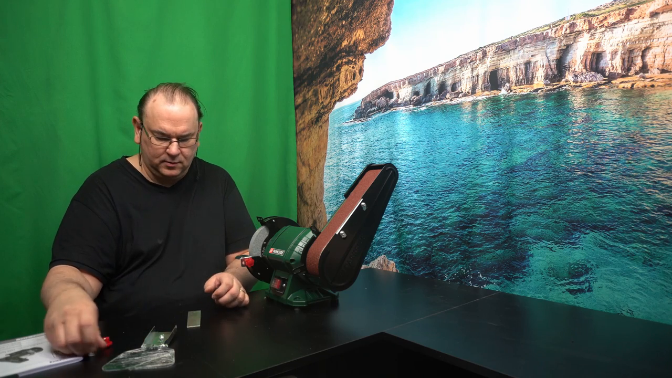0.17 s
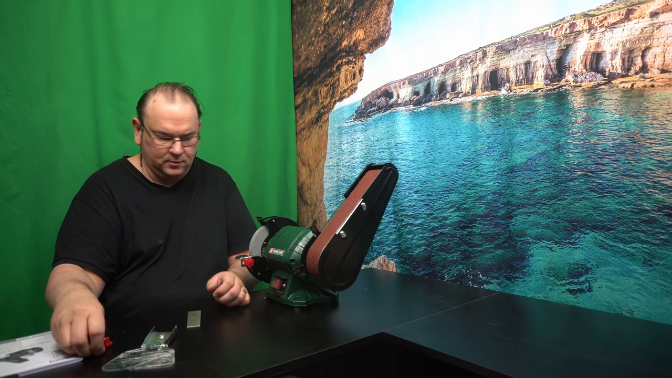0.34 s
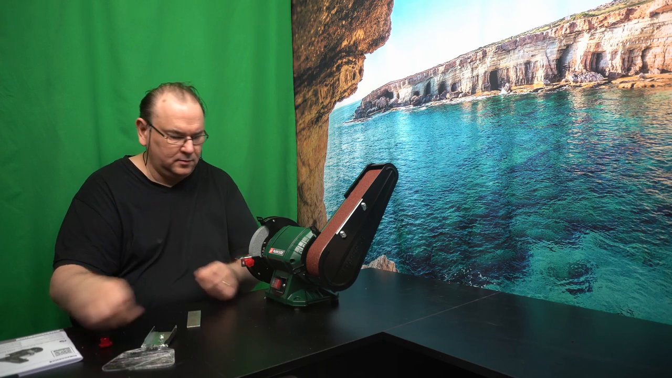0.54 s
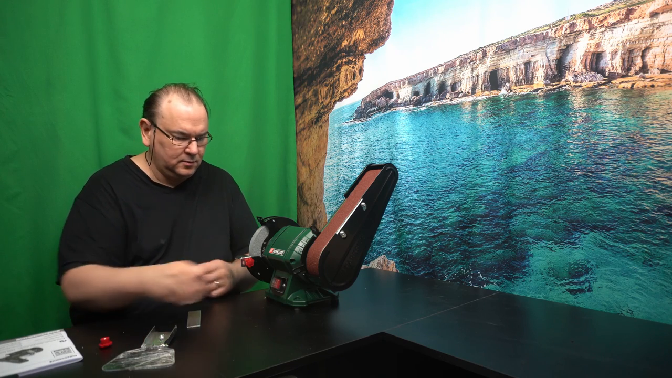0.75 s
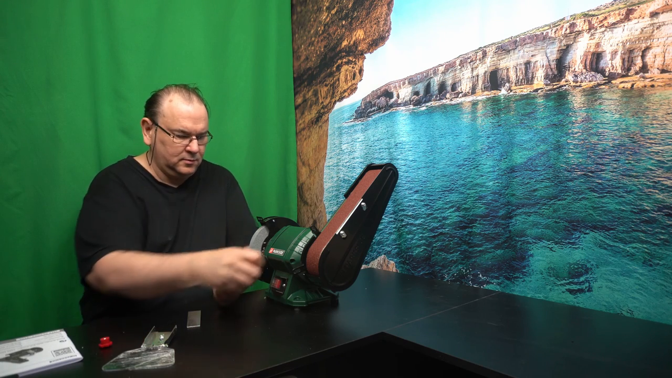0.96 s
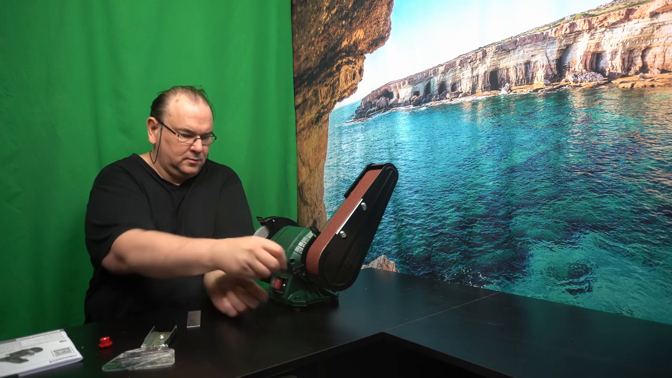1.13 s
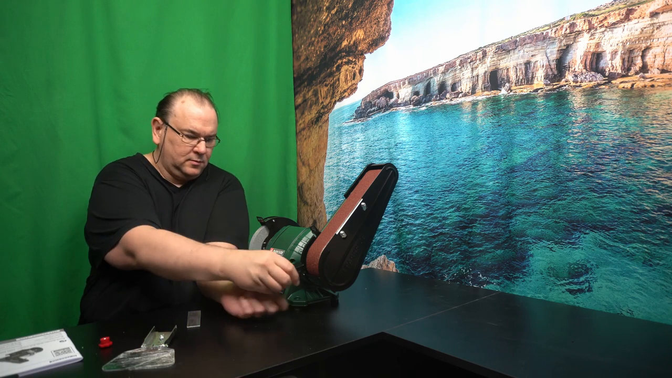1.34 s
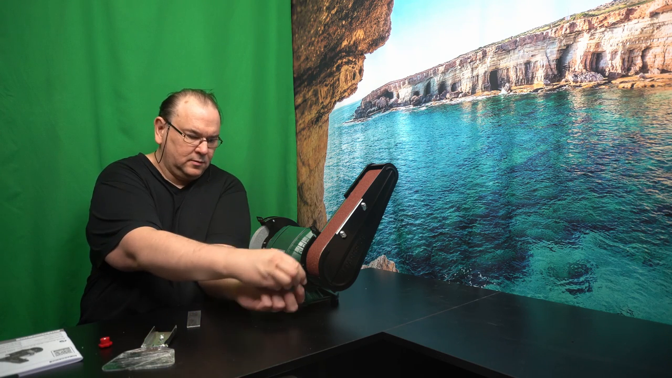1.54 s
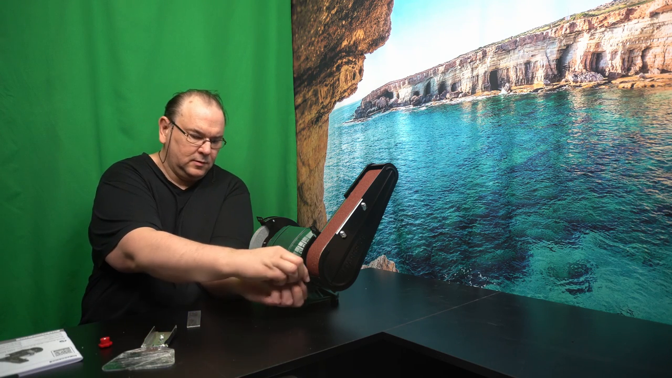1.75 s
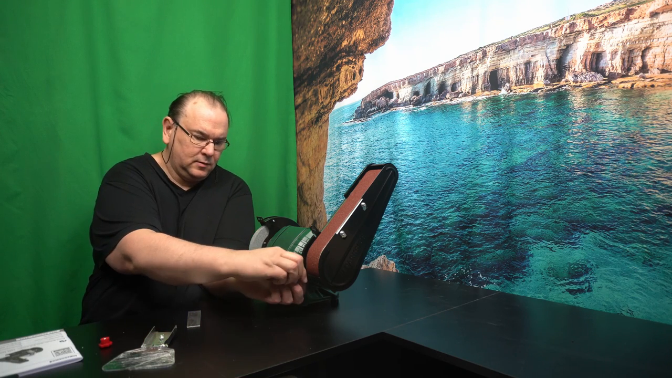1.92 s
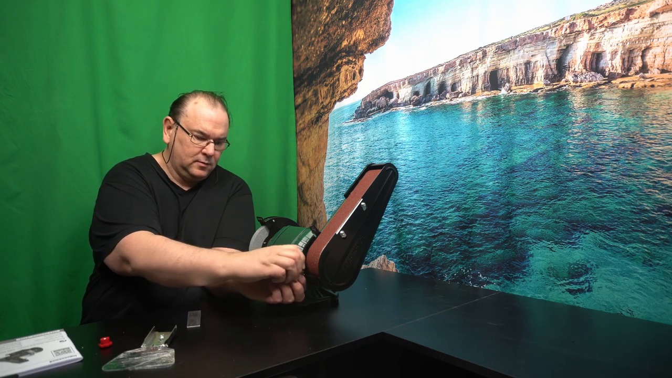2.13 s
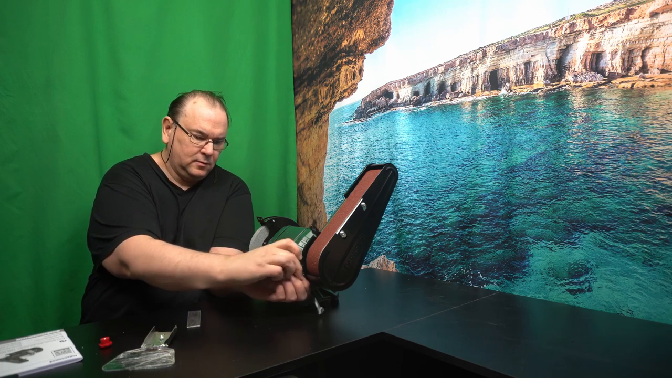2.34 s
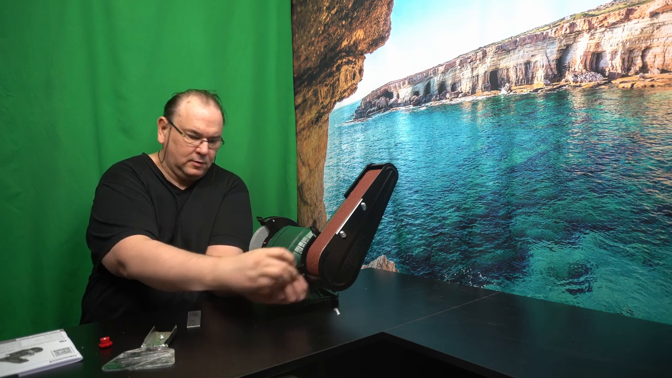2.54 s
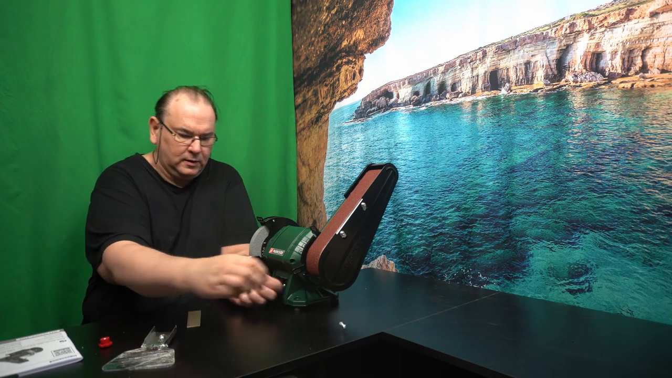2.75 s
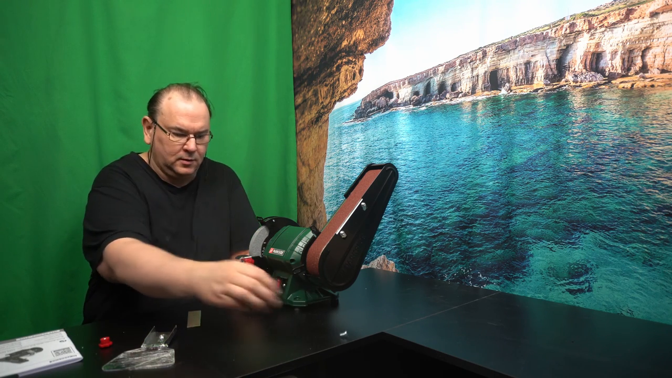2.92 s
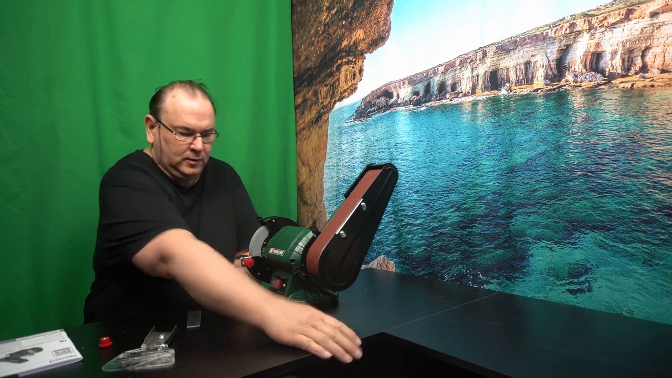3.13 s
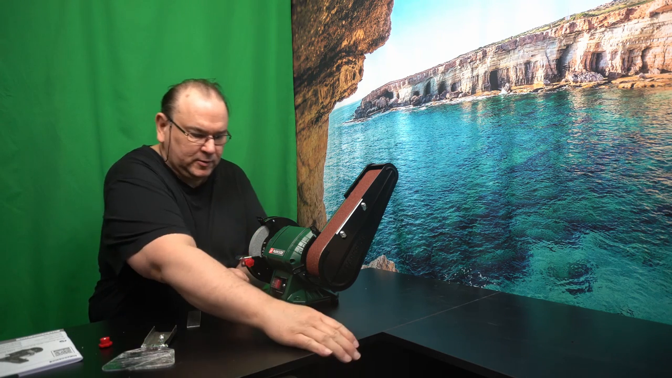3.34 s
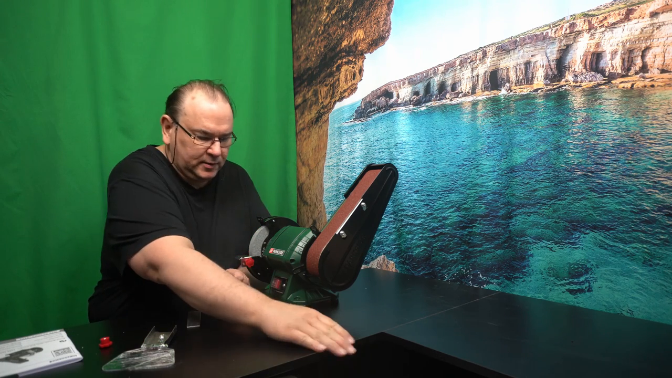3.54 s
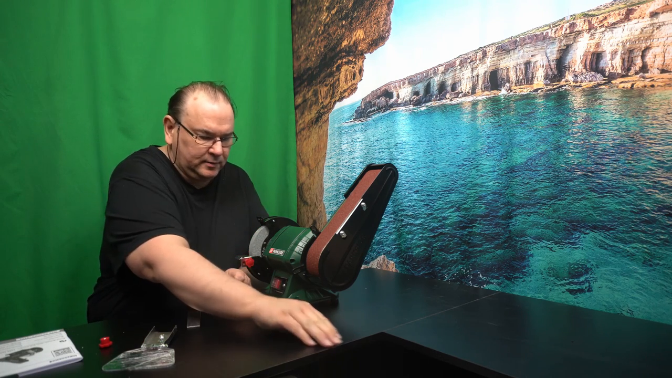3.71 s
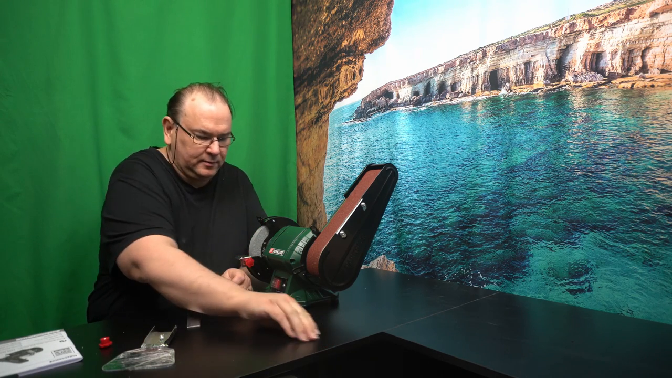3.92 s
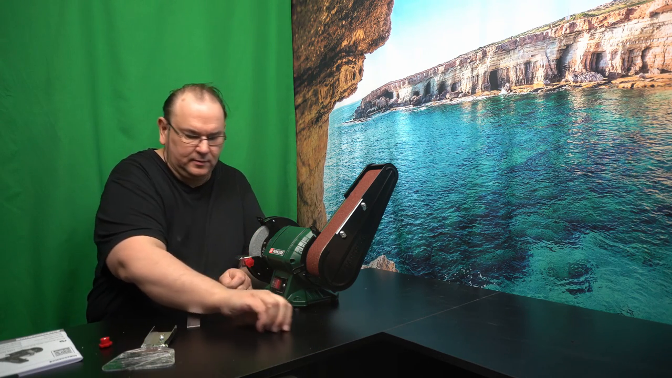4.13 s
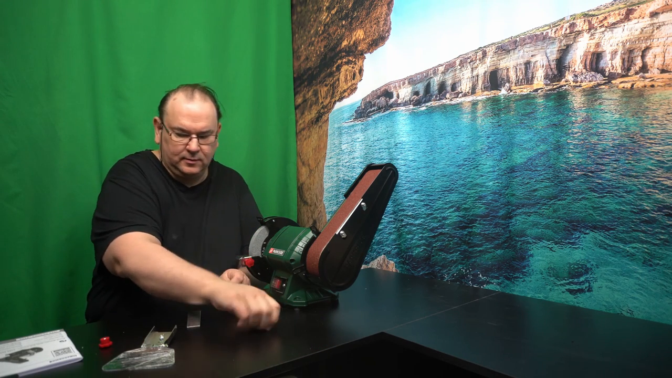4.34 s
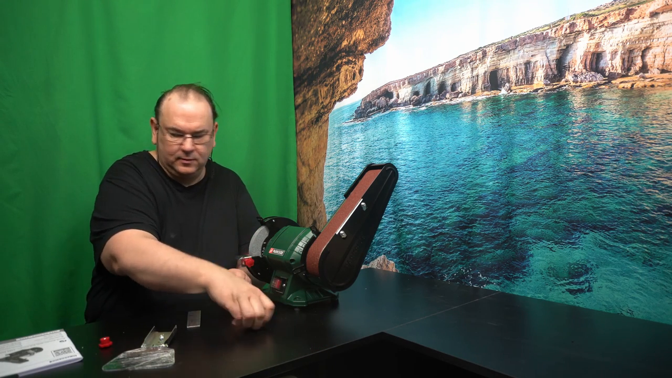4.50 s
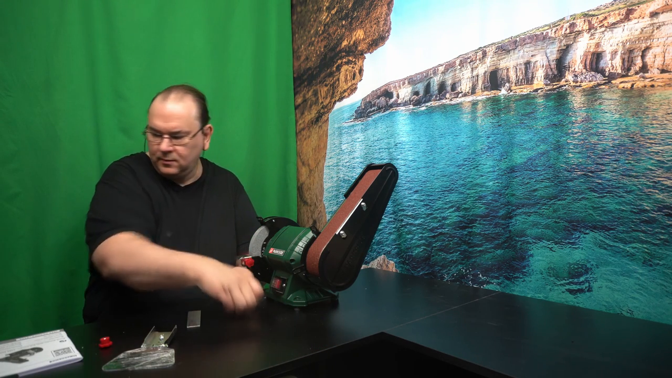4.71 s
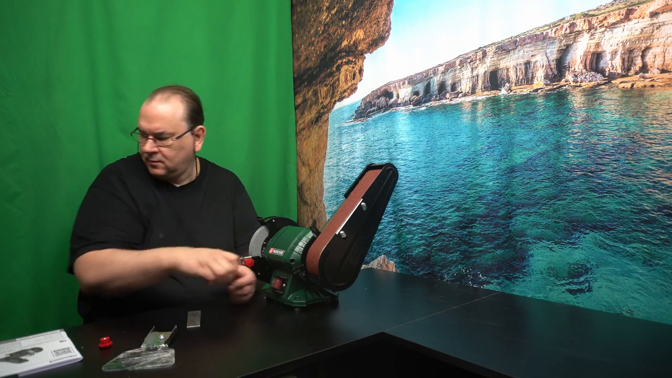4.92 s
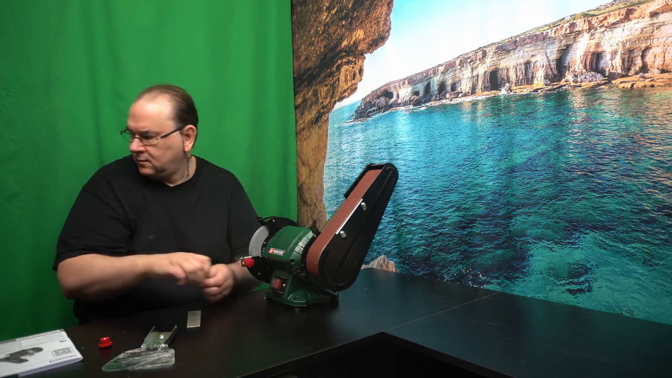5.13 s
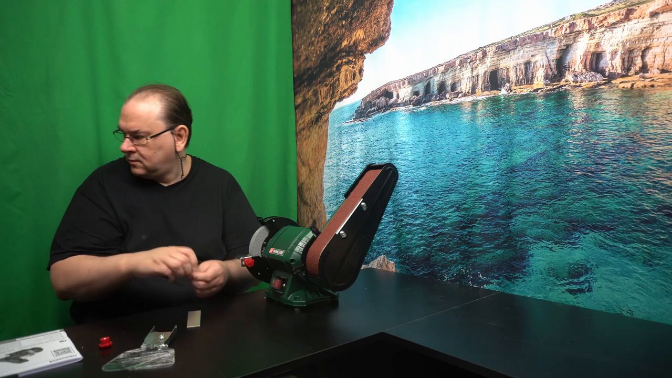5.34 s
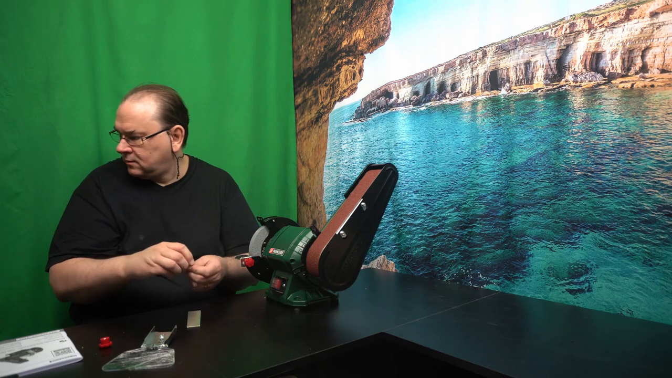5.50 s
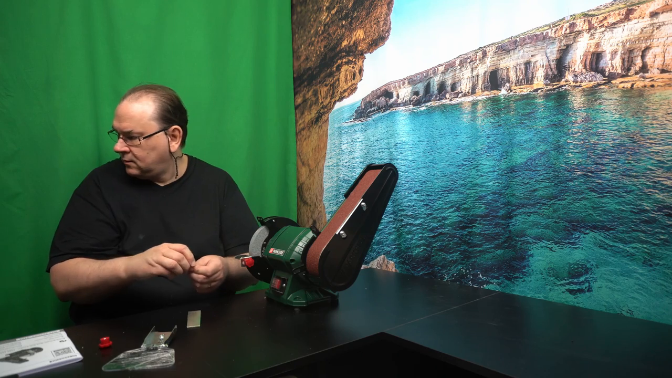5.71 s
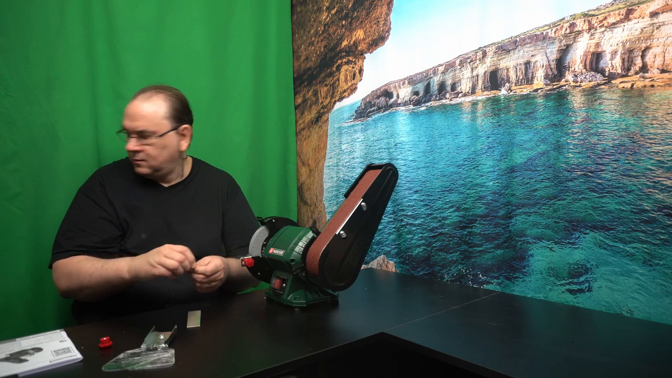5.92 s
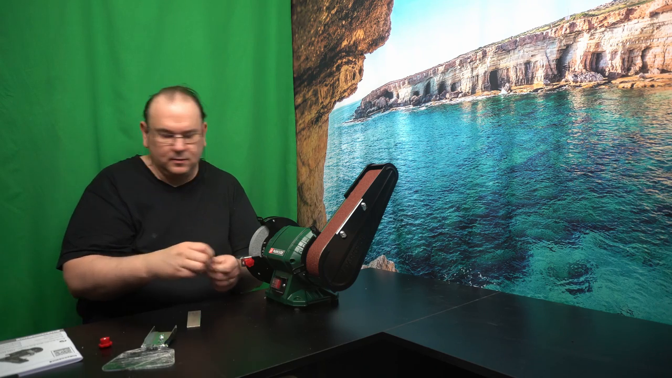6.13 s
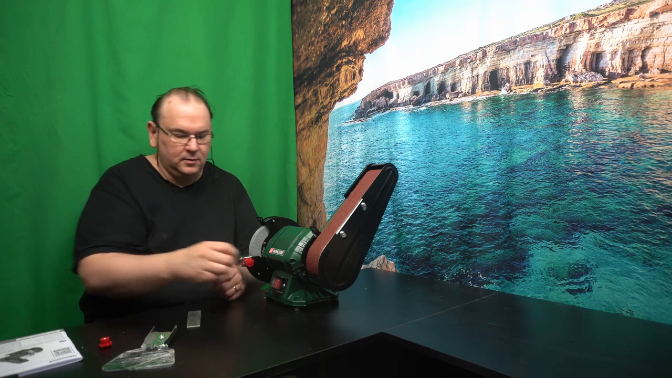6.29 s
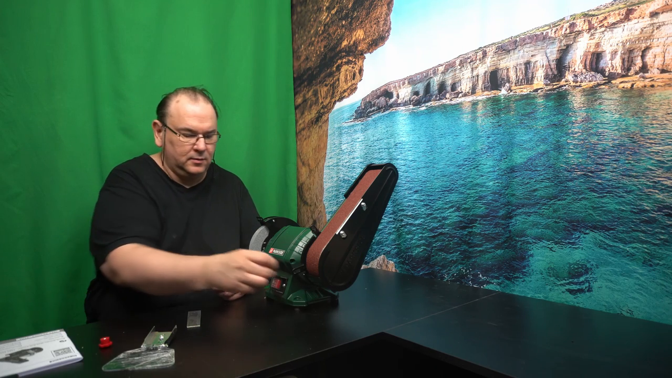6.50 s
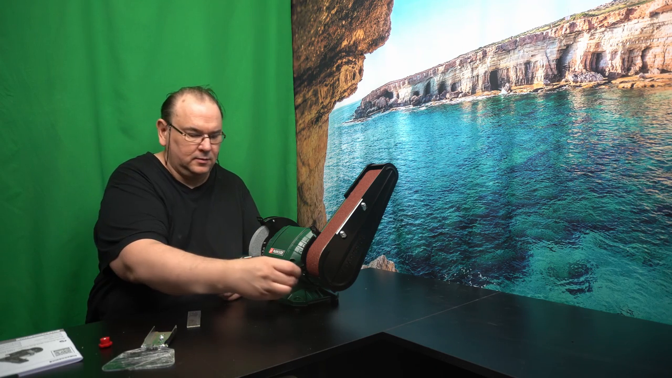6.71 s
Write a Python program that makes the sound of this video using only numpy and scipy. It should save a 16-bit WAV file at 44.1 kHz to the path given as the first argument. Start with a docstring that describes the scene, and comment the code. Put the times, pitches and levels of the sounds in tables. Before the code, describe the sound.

In a small quiet room with a steady low hum, someone near the microphone lifts a screw from a table with a few clicks. After a soft rustle of cloth come short ringing clinks against a metal bracket. The screw falls and clatters loudly across the tabletop, a hand slaps down on it, and it scrapes back over the board. Only faint sleeve movement and a few light ticks remain.

```python
"""A screw is picked off a table and fitted to a metal bracket; it slips, clinks down the machine,
bounces and rolls across the tabletop, and is dragged back. Its blows and rubbing sound through the
board's resonances; its knocks set guard, bracket and washer ringing. Sleeves rustle, fingernails
tick, and mains hum sits under the air of a small quiet room."""
import sys
import numpy as np
from scipy import signal
from scipy.fft import rfft, irfft
from scipy.io import wavfile
from scipy.ndimage import uniform_filter1d

SR = 44100
rng = np.random.default_rng(int(sys.argv[2]) if len(sys.argv) > 2 else 0)


def dump_mix(stems):
    """Bounce the given channels to the path in sys.argv[1] as a 16-bit WAV at rate SR."""
    frames = np.atleast_2d(stems).T  # one column per channel
    limited = np.clip(frames, -1, 1)  # hard clip at full scale
    pcm = np.round(limited * 32767).astype(np.int16)
    wavfile.write(sys.argv[1], SR, pcm)


N = 298021

# Tone of the sleeves and finger ticks. Each row: frequency in Hz, level in dB.
HANDLING_EQ = [(500, -5), (1000, -10), (1800, -3), (2300, -1), (3400, 1), (4200, -4.5), (8000, -14),
               (12000, -18), (16000, -17)]


def gain_of(db):
    """Decibels to a factor."""
    return 10 ** (np.asarray(db) / 20)


def unit_rms(x):
    """Scales to rms 1."""
    return x / np.sqrt(np.mean(x ** 2) + 1e-20)


def curve(points, hz, column=1):
    """Reads one column of a table on a log-frequency axis."""
    columns = np.transpose(points)
    return np.interp(np.log(hz + 1), np.log(columns[0] + 1), columns[column])


def add(mix, start, sound):
    """Mixes a sound in at start seconds."""
    part = mix[round(start * SR):][:len(sound)]
    part += sound[:len(part)]


def impulse(db):
    """Minimum-phase impulse response of an EQ curve spanning 0..SR/2."""
    log_gain = np.log(gain_of(np.maximum(np.r_[db, db[-2:0:-1]], -100)))
    return np.fft.ifft(np.exp(np.conj(signal.hilbert(log_gain)))).real[:len(db)]


def coloured(x, db):
    """Passes x through an EQ curve; the result has rms 1."""
    return unit_rms(signal.oaconvolve(x, impulse(db))[:len(x)])


def bands(hz, low_hz=800, high_hz=6600):
    """Low, mid and high shares of a smooth crossover."""
    low = 1 / (1 + (hz / low_hz) ** 6)
    high = 1 - 1 / (1 + (hz / high_hz) ** 8)
    return low, 1 - low - high, high


def bell(hz, centre, width, db):
    """A resonant bump for an EQ curve, in dB."""
    return db / (1 + (2 * (hz - centre) / width) ** 2)


def flicker(depth_db, samples):
    """A gain that wanders at random, smoothed over so many samples."""
    return gain_of(depth_db * unit_rms(uniform_filter1d(rng.standard_normal(N), samples)))


def fader(gestures, column):
    """Gain ride, silent between gestures; columns after 1 are dB offsets from column 1."""
    out = np.zeros(N)
    for gesture in gestures:
        columns = np.transpose(gesture)
        t = np.arange(columns[0, 0], columns[0, -1], 1 / SR)
        db = np.interp(t, columns[0], columns[1] + (columns[column] if column > 1 else 0))
        fades = np.minimum(1, np.minimum(t - t[0], t[-1] - t) / .008)
        add(out, t[0], gain_of(db) * fades)
    return out


def chatter(noise, t60, rise=.0005):
    """A contact: noise that starts sharply and dies away."""
    t = np.arange(len(noise)) / SR
    return noise * gain_of(-60 * t / max(t60, .004)) * np.minimum(1, t / max(rise, 1e-4))


def peaked(x, db):
    """Scales a short sound so that its envelope peaks at db."""
    return gain_of(db) * x / np.sqrt(2 * uniform_filter1d(x ** 2, size=60).max())


def resonate(x, hz, width):
    """A moving resonance: shifts the curve hz down to zero, smooths, and shifts back."""
    carrier = np.exp(2j * np.pi * np.cumsum(hz) / SR)
    pole = np.exp(-np.pi * width / SR)
    return unit_rms((carrier * signal.lfilter([1 - pole], [1, -pole], x / carrier)).real)


def tabletop(hz):
    """How the board answers a blow, in dB: a broad tone with ringing bumps."""
    # Each row: frequency in Hz, level in dB.
    board_eq = [(100, -29), (200, -8), (300, -6), (430, -6), (750, -6), (1200, -7.5), (2000, 0.5),
                (3200, 9), (4200, -0.5), (5500, -6), (7500, -16.5), (11000, -38.5), (16000, -33.5)]
    # Each row: resonance in Hz, width in Hz, boost in dB.
    board_rings = [(421, 20, 0.5), (950.6, 260, 2), (2040, 130, 3.5), (2970, 67, -6), (3040, 84, -2),
                   (3901, 84, -1.5), (5020, 1200, 2.5)]
    return curve(board_eq, hz) + sum(bell(hz, *ring) for ring in board_rings)


def room_tone():
    """Room air and microphone hiss under a mains hum that wavers slightly."""
    # Each row: frequency in Hz, relative level in dB.
    air_eq = [(30, -31), (45, -11), (75, -10.5), (125, 4.5), (200, -2), (400, -4), (700, -11.5),
              (1200, -14), (2200, -19.5), (3300, -20), (4500, -25), (7000, -33), (15500, -35.5)]
    # Each row: frequency in Hz, rms level in dB.
    hum_partials = [(50, -57), (100, -48.5), (200, -61)]
    hz, t = np.fft.rfftfreq(N, 1 / SR), np.arange(N) / SR
    air = unit_rms(irfft(rfft(rng.standard_normal(N)) * gain_of(curve(air_eq, hz)), N))
    hum = sum(gain_of(db) * np.sin(2 * np.pi * (f * t + rng.random())) for f, db in hum_partials)
    return gain_of(-53) * air + np.sqrt(2) * hum * flicker(depth_db=.21, samples=4000)


def screw_slides():
    """Thread and head roll and rub: a smooth scrape in the board, separate slips in the treble."""
    # One list per move. Each row: time in seconds, relative level in dB, rumble and grit offsets in dB.
    moves = [
        [(0.0, -19.5, -3.5, -31), (0.012, -39.5, -4.5, -18), (0.038, -53, 1, -15), (0.07, -60, -9.5, -13)],
        [(0.195, -56, -12, -6), (0.219, -23.5, -19.5, -26), (0.241, -31, -7, -36), (0.295, -26, -15, -42),
         (0.305, 3, -15, -23)],
        [(3.03, -26, -17, -21.5), (3.094, -31, -20.5, -52.5), (3.18, -24, -21, -49), (3.184, -26, -8.5, -29),
         (3.19, -22, -27.5, -29.5)],
        [(3.2, -21, -29.5, -25), (3.21, -31.5, -7.5, -13.5), (3.26, -39, -11, -27.5), (3.286, -24, -34, -17.5),
         (3.32, -34, 10, -33)],
        [(3.52, -51, -1, -18.5), (3.59, -54, -14, -8.5), (3.668, -47, -3, -8), (3.676, -35, -11, -24),
         (3.768, -21, -18, -29.5), (3.82, -23.5, -10, -13), (3.838, -18, -20, -24), (3.89, -25.5, -17.5, -46),
         (4.064, -23, -22, -28.5), (4.138, -22, -2.5, -29), (4.154, -24.5, -15, -31.5), (4.18, -23, -3.5, -39),
         (4.246, -31.5, -15, -52), (4.29, -26.5, -18, -21), (4.31, -58, 4, -42)],
        [(4.385, -33, -6, -29), (4.457, -33, -12, -53), (4.491, -24.5, -5.5, -65), (4.509, -29, 3.5, -28),
         (4.521, -20.5, -24, -55.5), (4.579, -32, -9.5, -58), (4.63, -55, 19, -26)],
    ]
    # Treble of the rubbing. Each row: frequency in Hz, level in dB.
    grit_eq = [(5000, -6), (7500, 0), (9000, -6), (11000, -15), (16000, -22)]
    # The ring favoured along the way. Each row: time in seconds, pitch in Hz, dB against the scrape.
    ring_path = [(0, 2500, 0), (.2, 3150, -9.5), (.3, 3200, -9), (3.03, 3300, -5), (3.3, 3200, -8),
                 (3.7, 3300, -12.5), (3.85, 3280, -2), (4.1, 3250, -9), (4.17, 3000, -18),
                 (4.22, 2200, -0.5), (4.3, 3000, -21), (4.42, 3300, -12), (4.47, 2500, 1.5),
                 (4.63, 2450, -6.5)]
    hz, t = np.fft.rfftfreq(2048, 1 / SR), np.arange(N) / SR
    low_db, mid_db, high_db = (25 * np.log10(share + 1e-4) for share in bands(hz))
    slipping = rng.random(N) < 350 / SR  # about 350 slips a second
    strength = gain_of(3 * np.minimum(rng.exponential(1, N), 4))
    slips = unit_rms(slipping * strength * rng.choice([-1., 1.], N))
    rub = rng.standard_normal(N) * flicker(depth_db=2.2, samples=300)
    friction = rub + .2 * slips
    times, ring_hz, ring_db = np.transpose(ring_path)
    pitch = np.interp(t, times, ring_hz)
    ring = resonate(resonate(friction, pitch, width=830), pitch, width=830)
    scrape = coloured(friction, tabletop(hz) + mid_db) + gain_of(np.interp(t, times, ring_db)) * ring
    loaded_board = bell(hz, centre=425, width=140, db=22)  # the board hums low under load
    rumble = coloured(friction, tabletop(hz) + low_db + loaded_board)
    grit = coloured(rub + 1.2 * slips, curve(grit_eq, hz) + high_db)
    return fader(moves, 1) * scrape + fader(moves, 2) * rumble + fader(moves, 3) * grit


def sleeves():
    """Cloth sliding on cloth: soft flickering hiss."""
    # One list per rustle. Each row: time in seconds, level in dB, fizz offset in dB.
    rustles = [
        [(0.05, -49, -17), (0.152, -50.5, -10), (0.194, -50, -4), (0.204, -34, -22), (0.21, -17, -8)],
        [(0.42, -75, -35), (0.454, -59, -6), (0.508, -48, -14), (0.566, -68, -6), (0.654, -66, -3),
         (0.7, -82, 6), (0.862, -64, -7), (1.192, -53.5, -4.5), (1.41, -52, -8), (1.474, -58.5, -5),
         (1.552, -57.5, -11), (1.632, -79, -8), (1.692, -64, -4), (1.7, -76, 1)],
        [(4.85, -67, 0), (4.878, -77, -4.5), (4.914, -59, -9), (4.97, -51.5, -12), (5.18, -65.5, -6),
         (5.438, -74, -11.5), (5.448, -70, -14), (5.494, -74, -2), (5.54, -71, -15), (5.6, -81, -6)],
        [(6.0, -77.5, -15), (6.128, -85, -11), (6.22, -64, -11), (6.232, -72, -21), (6.242, -69, -3),
         (6.31, -59.5, -9), (6.564, -62.5, -12), (6.582, -86.5, -1), (6.72, -72.5, -2)],
    ]
    hz = np.fft.rfftfreq(1024, 1 / SR)
    fibres = rng.standard_normal(N) * flicker(depth_db=.73, samples=490)
    high = bands(hz, high_hz=5470)[2]
    body, fizz = (coloured(fibres, curve(HANDLING_EQ, hz) + 20 * np.log10(share + 1e-4))
                  for share in (1 - high, high))
    return fader(rustles, 1) * body + fader(rustles, 2) * fizz


def screw_bounces():
    """Each blow is a push and brief chatter; returns direct sound and what escapes the hand to the room."""
    # Each row: start in seconds, peak in dB, ring in Hz, thud in dB (-16 is flat),
    # tick in dB (-28 is flat), contact t60 in seconds, room send in dB (capped at +3).
    blows = [(0.22, -17, 3120, -26, -42, 0.012, 5.5), (0.2426, -12.5, 3040, -33.5, -56, 0.025, 8),
             (0.3045, -3.5, 3240, -28, -49, 0.022, -8.1), (2.4008, 7, 3830, -23.5, -27.5, 0.017, -2.5),
             (2.5378, -3, 3190, -28.5, -25.5, 0.023, -2), (2.5424, 1.5, 3280, -26.5, -17, 0.033, -2.6),
             (2.6472, 1, 3450, -28, -16, 0.017, -1.5), (2.6752, 2, 3210, -32.5, -26, 0.034, -5.7),
             (2.758, -0.5, 2970, -37.5, -23, 0.025, -1.5), (2.7702, -0.5, 2970, -25, -22.5, 0.018, -6.5),
             (2.8289, -6, 3130, -34, -26, 0.046, 5), (2.8389, -4.5, 3200, -28, -26.5, 0.03, -8.5),
             (2.8871, -2, 3820, -36, -10.5, 0.025, -7), (2.9232, -6.5, 2770, -27.5, -20, 0.02, -1.3),
             (2.9514, -6, 2780, -27.5, -16, 0.022, -2.5), (2.9836, -4, 2780, -33.5, -29, 0.019, 0.8),
             (3.0087, -11.5, 3300, -28, -36, 0.044, -2), (3.0252, -14, 3350, -26, -40, 0.027, 3),
             (3.0374, -24, 3360, -21.5, -34, 0.013, 6), (3.0494, -18, 2800, -21.5, -39, 0.022, 5),
             (3.0614, -19.5, 3300, -28.5, -38.5, 0.016, -8), (3.073, -18, 3270, -24.5, -40, 0.047, -20),
             (3.0836, -16.5, 3300, -32.5, -41, 0.034, 10), (3.1064, -18, 3290, -24.5, -43.5, 0.022, 7),
             (3.1583, -24.5, 3220, -16.5, -16.5, 0.022, 11), (3.1933, -2, 3290, -36.5, -40, 0.045, -2.5),
             (3.2275, -10, 3670, -25.5, -14, 0.036, -1.5), (3.2535, -16, 3680, -21, -16.5, 0.025, -5.5),
             (3.2718, -21, 2230, -43, -23, 0.032, 3), (3.2859, -18, 3310, -33, -33, 0.028, 0.5),
             (3.5562, -39, 3400, -20, -20, 0.022, -0.6), (3.5912, -34, 3350, -26, -11, 0.026, 1.5),
             (3.679, -26, 2270, -21, -27, 0.014, 9), (3.9135, -16.5, 3270, -22, -22, 0.027, 6),
             (4.024, -18, 3680, -23, -9, 0.011, 7), (4.0427, -18, 3130, -33, -22, 0.013, 8),
             (4.147, -8.5, 3030, -16, -19, 0.028, 2), (4.3728, -13.5, 2970, -26.5, -25, 0.032, -1.8),
             (4.4093, -20, 2520, -31, -54, 0.011, 8), (4.4864, -23, 2380, -22, -38, 0.047, -6),
             (4.5182, -23, 2720, -30, -29, 0.0073, 8)]
    direct, send = np.zeros(N), np.zeros(N)
    hz = np.fft.rfftfreq(2048, 1 / SR)
    low, _, high = bands(hz)
    push = 1.2 * np.hanning(36)
    for start, db, ring_hz, thud_db, tick_db, t60, send_db in blows:
        shelves = low * (thud_db + 16) + high * (tick_db + 28)
        tone = tabletop(hz) + shelves + bell(hz, ring_hz, width=600, db=4)
        contact = chatter(rng.standard_normal(2500), t60, rise=.09 * t60)
        add(contact, .001, push)
        blow = peaked(np.convolve(contact, impulse(tone)), db)
        add(direct, start, blow)
        add(send, start, gain_of(min(send_db, 3)) * blow)
    return direct, send


def low_thumps():
    """Short low thumps, a hand slap and the bass of overloaded hits: a dying sine."""
    # Each row: start in seconds, peak in dB, pitch in Hz, t60 in seconds.
    thumps = [(.306, -38, 200, 0.16), (2.401, -31, 135, 0.13), (2.539, -36, 135, 0.16),
              (2.649, -33, 135, .15), (3.194, -27.5, 130, .2)]
    out, t = np.zeros(N), np.arange(SR // 4) / SR
    for start, db, hz, t60 in thumps:
        add(out, start, gain_of(db - 60 * t / t60) * np.sin(2 * np.pi * hz * t))
    return out


def finger_ticks():
    """Fingernails and small parts tick in the hand: bare contact with no ring."""
    # Each row: start in seconds, peak in dB, t60 in seconds.
    ticks = [(1.4334, -42, 0.024), (6.2302, -51, 0.03), (6.2958, -42.5, 0.025), (6.7292, -32, 0.024),
             (6.7444, -31, 0.03)]
    out = np.zeros(N)
    tone = impulse(curve(HANDLING_EQ, np.fft.rfftfreq(512, 1 / SR)))
    for start, db, t60 in ticks:
        contact = chatter(rng.standard_normal(2500), t60)
        add(out, start, peaked(np.convolve(contact, tone), db))
    return out


def machine_clinks():
    """A short scratchy contact sets guard, bracket and washer ringing and the casting clattering."""
    # Modes of the three parts. Each row: frequency in Hz, level in dB, undamped t60 in seconds.
    guard = [(421, -17.5, .12), (562, -.5, .2), (823, -1.5, .16), (1075, -3.5, .12), (1297, -6.5, .1),
             (1615, -10.5, .1), (1775, 0.5, .09), (1998, -8.5, .1), (2737, -9, 0.12)]
    bracket = [(3430, -3.5, .1), (4870, -17, .1), (5370, -7.5, 0.065), (6630, -1.5, .1), (7005, 0, .1),
               (7510, -4, .12), (8510, -9, .08)]
    washer = [(2968, -10.5, .4), (3045, -3.5, 0.29), (5450, -6.5, .14), (5920, -5, .09), (6085, -7, .15),
              (8210, -16.5, 0.078), (9712, -4, 0.073), (10220, -7, 0.071), (10000, -9, .07),
              (11400, -12, 0.039)]
    # The casting's countless small modes. Each row: frequency in Hz, level in dB.
    casting_eq = [(300, -19.5), (1000, -5.5), (3000, 5.5), (7000, -3), (10000, -9), (16000, -19)]
    # Each row: start in seconds, guard, bracket, washer and clatter peaks in dB, contact t60 in seconds.
    knocks = [(1.735, -46.5, -55.5, -74, -69.5, .03), (1.952, -27, -52, -69.5, -52, .03),
              (2.022, -37.5, -33, -53, -37, .03), (2.035, -16.5, -43.5, -47, -38.5, .04),
              (2.115, -15.5, -25, -40.5, -29.5, .03), (2.127, -10.5, -15.5, -34.5, -28, .04),
              (2.224, -30.5, -30, -36, -22.5, .03), (2.259, -20, -31, -8, -33.5, .015),
              (2.355, -35, -63, -62, -54, .05), (6.2, -46, -75, -75, -66, .06)]
    out, t = np.zeros(N), np.arange(SR // 2) / SR
    grip = (gain_of(-60 * t / .045) + .25) * np.minimum(1, t / .0015)  # fingers and bolts damp the ring
    rings = [grip * sum(gain_of(db - 60 * t / t60) * np.cos(2 * np.pi * f * t) for f, db, t60 in modes)
             for modes in (guard, bracket, washer)]
    casting = impulse(curve(casting_eq, np.fft.rfftfreq(512, 1 / SR)))
    for start, *ring_db, clatter_db, t60 in knocks:
        noise = rng.standard_normal(9000)
        contact = chatter(noise, t60)
        clatter = contact + gain_of(-12.5) * chatter(noise, t60=.17)
        add(out, start, peaked(np.convolve(clatter, casting), clatter_db))
        add(contact, .0007, [8.])  # the first touch excites every mode alike
        for ring, db in zip(rings, ring_db):
            add(out, start, peaked(signal.fftconvolve(contact, ring), db))
    return out


def room_echo(x):
    """Sparse echoes of random sign, each band dying at its own speed; curtains swallow the treble."""
    # Each row: frequency in Hz, t60 in seconds, level in dB.
    reverb = [(193, .3, -6.5), (677, 0.4, 3), (2124, 0.21, -1.5), (4033, 0.24, -5.5), (6600, .2, -4.5),
              (10000, .2, -9), (16960, .17, -11.5)]
    predelay, spacing = 180, 20  # samples
    taps = np.zeros(SR // 2)
    slots = np.arange(predelay, SR // 2 - spacing, spacing)
    taps[slots + rng.integers(0, spacing, len(slots))] = rng.choice([-1., 1.], len(slots))
    hz, t, spectra = signal.stft(taps, SR, nperseg=128)
    spectra *= gain_of(-60 * t / curve(reverb, hz)[:, None])
    spectra /= np.linalg.norm(spectra, axis=1, keepdims=True)
    spectra *= gain_of(curve(reverb, hz, column=2))[:, None]
    tail = signal.istft(spectra, SR, nperseg=128)[1] * np.sqrt(3 / 4) / 64  # window energy
    tail[:predelay] = 0
    return signal.fftconvolve(x, tail)[:N]


def scene():
    """The screw and hands at the table, their echo, and the room tone, in mono."""
    blows, blow_send = screw_bounces()
    low_cut = signal.butter(2, 330, "high", fs=SR, output="sos")
    clinks = signal.sosfilt(low_cut, machine_clinks() + finger_ticks())
    slides = gain_of(-3.5) * screw_slides()
    echo = room_echo(blow_send + gain_of(-3.5) * clinks + gain_of(-2) * slides)
    return (blows + low_thumps() + clinks + slides + echo + sleeves() + room_tone())[None]


def record(dry):
    """The loudest blows overload the input; a low-pass rolls off the top at 16 kHz."""
    clipped = np.clip(dry, -1, 1)
    low_pass = signal.firwin(255, 16000, window=("kaiser", 3), fs=SR)
    return np.clip(signal.oaconvolve(clipped, low_pass[None], "same"), -1, 1)


dry = scene()
out = record(dry)
dump_mix(out)
```